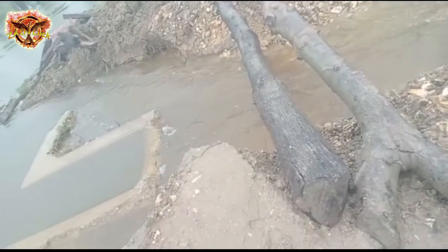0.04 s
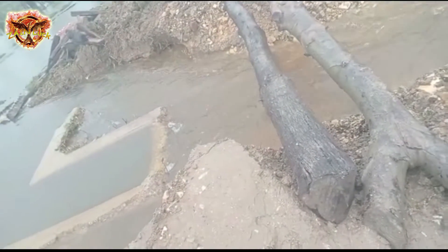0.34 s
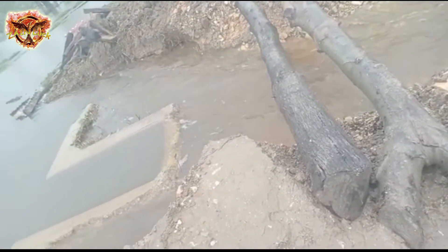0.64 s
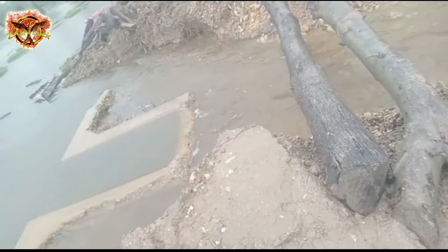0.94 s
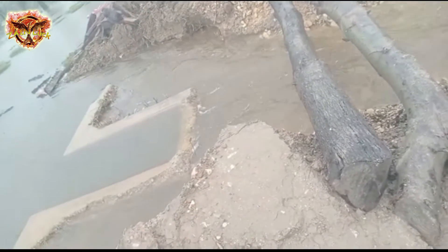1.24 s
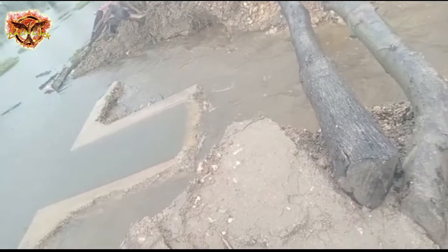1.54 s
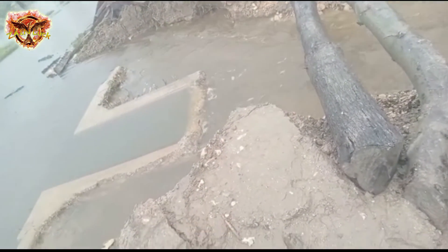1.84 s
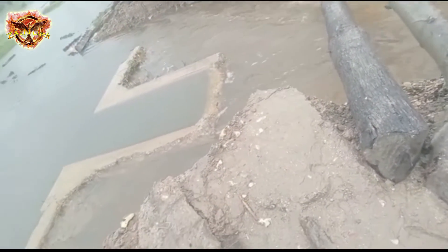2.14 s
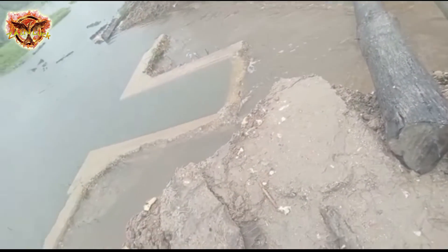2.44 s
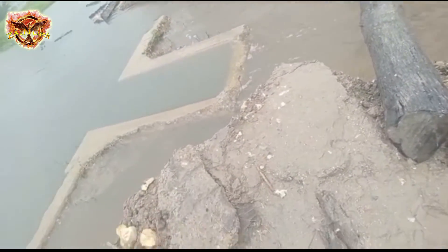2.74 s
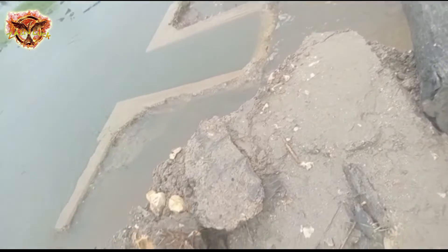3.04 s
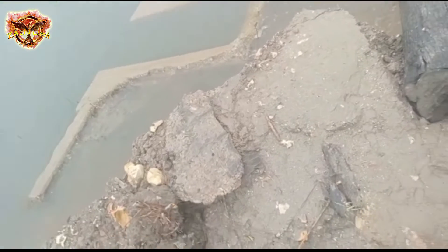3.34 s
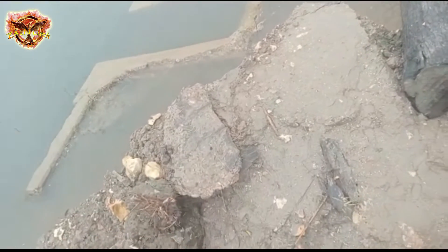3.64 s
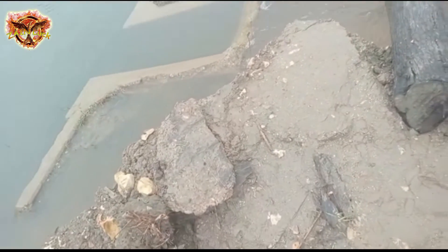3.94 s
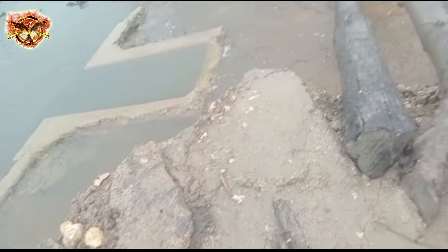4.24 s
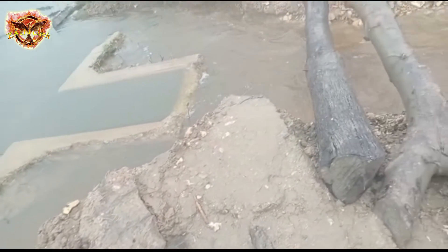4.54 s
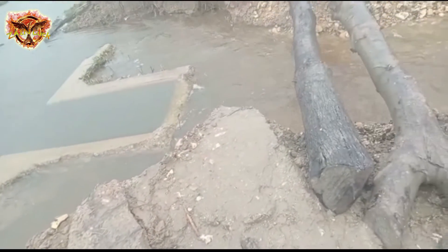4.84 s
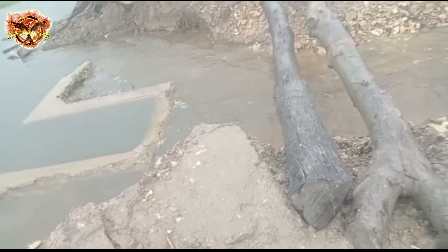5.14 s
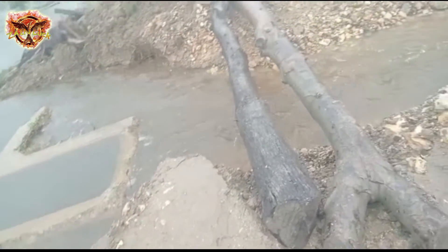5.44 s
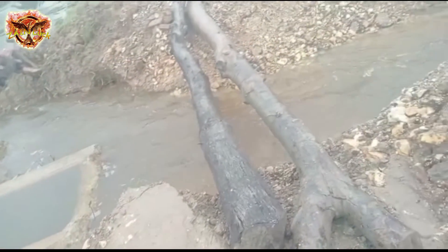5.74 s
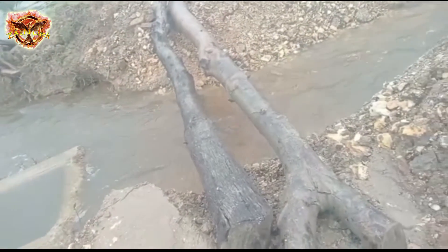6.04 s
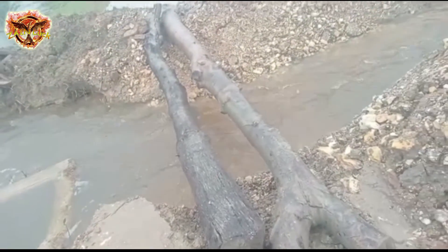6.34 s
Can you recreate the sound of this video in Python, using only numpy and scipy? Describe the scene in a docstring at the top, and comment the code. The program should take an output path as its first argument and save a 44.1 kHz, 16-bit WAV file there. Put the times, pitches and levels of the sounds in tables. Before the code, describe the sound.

A shallow muddy stream flows throughout with a steady fizzing rush, a lower gurgle and the odd glug. Over it, water drops strike the microphone in quick irregular ticks and hollow knocks, some much harder than others. Light wind rumbles underneath and swells into a soft gust past the middle. It is heard outdoors from the bank on a dull handheld microphone.

```python
"""Muddy floodwater rushes through a gap in a gravel road while drops knock sharply on the microphone.
Clumps of ringing bubbles make the stream: a dense fizz and rush over a lower gurgle, with the odd glug.
Each drop rings the microphone's housing with a thump, a knock and a tick. Wind rumbles on the port,
swelling to a soft gust past the middle. All is heard from the bank on a dull handheld microphone."""
import sys
import numpy as np
from scipy import signal
from scipy.fft import rfft, irfft, next_fast_len
from scipy.io import wavfile
from scipy.ndimage import uniform_filter1d, minimum_filter1d

SR = 44100
rng = np.random.default_rng(int(sys.argv[2]) if len(sys.argv) > 2 else 0)


def master(y):
    """Save y as 16-bit WAV."""
    cut = np.clip(np.atleast_2d(y).T, -1, 1)
    pcm = np.round(cut * 32767)  # scale
    wavfile.write(sys.argv[1], SR, pcm.astype(np.int16))


N = 286650
TIME = np.arange(N) / SR
THUMP_CYCLES, KNOCK_CYCLES, TICK_CYCLES = 4.17, 3.84, 7.27   # for the housing's rings to die by 60 dB


def from_db(db):
    """Decibels to gain."""
    return 10 ** (np.asarray(db) / 20)


def rms_one(x):
    """Scale to unit power."""
    return x / np.sqrt(np.mean(x ** 2) + 1e-20)


def in_time(rows):
    """Turn rows of a time in seconds and its values into one envelope per value."""
    times, *columns = np.transpose(rows)
    return [np.interp(TIME, times, column) for column in columns]


def add(out, sound, start_s):
    """Mix a short sound in at a given time."""
    at = int(np.clip(round(start_s * SR), 0, N))
    out[at:at + len(sound)] += sound[:N - at]


def coloured(x, spectrum):
    """Equalise along a curve of (Hz, dB) points."""
    size = next_fast_len(N + SR // 10)
    hz, db = np.transpose(spectrum)
    bin_hz = np.maximum(np.arange(size // 2 + 1) * SR / size, 1)
    gain = from_db(np.interp(np.log(bin_hz), np.log(hz), db))
    return irfft(rfft(x, size) * gain, size)[:N]


def softened(x, corner_hz):
    """Take off the treble, as a soft contact does by spreading a push in time."""
    return signal.sosfilt(signal.butter(2, np.clip(corner_hz, 100, .4 * SR), fs=SR, output="sos"), x)


def low_cut(x, corner_hz):
    """Roll off the bass."""
    return signal.sosfilt(signal.butter(2, corner_hz, "high", fs=SR, output="sos"), x)


def drift(rate_hz, hop=40, settle=2000):
    """A smooth random wander of unit power, mostly slower than rate_hz."""
    pole = np.exp(-2 * np.pi * rate_hz * hop / SR)
    noise = rng.standard_normal(N // hop + settle + 2)
    slow = signal.lfilter([1], [1, -2 * pole, pole * pole], noise)[settle:]
    return np.interp(np.arange(N) / hop, np.arange(len(slow)), rms_one(slow))


def ring(clicks, hz, cycles):
    """A unit click starts a ring at its crest, height near 1, which dies by 60 dB in so many cycles."""
    angle = 2 * np.pi * hz / SR
    decay = np.exp(-np.log(1000) * hz / (cycles * SR))
    strike = np.array([0, 1, -1]) * decay * np.sin(angle) / angle
    return signal.lfilter(strike, [1, -2 * decay * np.cos(angle), decay * decay], clicks + 1e-18)


def wind(level_db, lumps_db, upper_hz=83.4, deep_hz=100):
    """Eddies at the port make a lumpy rumble, whose weight moves up in pitch as the gust grows."""
    # The wind's rise and fall. Each row: time in seconds, relative level in dB.
    gusts = [(0.0, -52.5), (0.69, -49.5), (0.94, -56), (1.28, -51.5), (2.12, -46.5), (2.23, -49),
             (2.62, -42), (3.11, -47.5), (3.31, -45.5), (3.48, -37.5), (3.95, -41), (4.56, -29.5),
             (4.96, -41), (5.21, -37.5), (5.43, -45), (5.87, -46.5), (6.23, -59), (6.5, -47.5)]
    # The rumble's colour. Each row: frequency in Hz, gain in dB.
    rumble = [(20, -21), (40, -15.5), (70, -1), (120, 1), (180, -4.5), (260, -8.5), (380, -18),
              (600, -29.5), (4000, -94.5)]
    gust_db, = in_time(gusts)
    deep, upper = (coloured(noise, rumble) * from_db(lumps_db * drift(18))
                   for noise in rng.standard_normal((2, N)))
    upper = rms_one(low_cut(upper, upper_hz))
    deep = rms_one(softened(deep, deep_hz))
    deep_db = -50 + 0.54 * (gust_db - gust_db.mean())   # the deepest eddies swell less with a gust
    return from_db(gust_db + level_db) * upper + from_db(deep_db) * deep


def puffs(cycles, corner_hz, size=4096):
    """A lone eddy bumps the port with a dull thud."""
    # Single puffs of air. Each row: start in seconds, pitch in Hz, strength in dB.
    eddies = [(0.594, 288, -24.5), (2.663, 191, -17), (2.821, 172, -25.5), (3.268, 204, -21.5),
              (5.318, 144.4, -22.5)]
    out = np.zeros(N)
    push = softened(signal.unit_impulse(size), corner_hz)
    for start_s, hz, db in eddies:
        add(out, from_db(db) * ring(push, hz, cycles), start_s)
    return out


def glugs(life_s, rise):
    """A large bubble swells, rings and rises in pitch as it nears the surface."""
    # Air pockets closing in the stream. Each row: start in seconds, starting pitch in Hz, peak in dB.
    pockets = [(0.44, 586, -32.5), (0.525, 670, -56), (1.775, 632, -36), (1.8, 705, -57), (4.1, 610, -39.5),
               (5.045, 810, -45.5), (5.69, 820, -64)]
    out = np.zeros(N)
    age = TIME[:SR // 8] / life_s
    swell = age * np.exp(1 - age)
    for start_s, hz, db in pockets:
        phase = 2 * np.pi * hz * life_s * (age + rise * age ** 2)
        add(out, from_db(db) * swell * np.sin(phase), start_s)
    return out


def bubbles(low_hz, high_hz, per_s, cycles, spread_db, clump_db, pitches=24):
    """Bubbles of many sizes are born in clumps as wavelets break; each rings briefly at its pitch."""
    births = np.flatnonzero(rng.random(N) < per_s * from_db(clump_db * drift(7)) / SR)
    strengths = from_db(spread_db * np.minimum(rng.exponential(1, N), 4)) * rng.choice([-1, 1], N)
    pitch_index = rng.integers(0, pitches, N)
    out = np.zeros(N)
    for k, hz in enumerate(np.geomspace(low_hz, high_hz, pitches)):
        at = births[pitch_index[births] == k]
        clicks = np.zeros(N)
        clicks[at] = strengths[at]
        out += ring(clicks, hz, cycles) * hz / high_hz   # all sizes share the power evenly per Hz
    return rms_one(out)


def water(spectrum, near_bubbles, wash_db):
    """Single near bubbles stand out of the smooth wash of countless far ones."""
    wash = from_db(wash_db) * rng.standard_normal(N)
    return rms_one(coloured(near_bubbles + wash, spectrum))


def stream():
    """Large pockets of air gurgle, middle-sized bubbles rush, the smallest fizz."""
    # The surge of the flow. Each row: time in seconds, then gurgle, rush and fizz faders in dB.
    surge = [(0.0, -51, -41, -52), (0.98, -51, -45, -55), (1.14, -50.5, -40.5, -53),
             (1.3, -49.5, -45.5, -58.5), (1.9, -50.5, -45, -57.5), (2.06, -51, -44.5, -52.5),
             (2.24, -54, -49.5, -64.5), (2.51, -51.5, -48, -56.5), (2.66, -51.5, -46.5, -60),
             (3.98, -51, -42.5, -48), (4.27, -51, -42.5, -49.5), (4.47, -52, -44, -52.5),
             (4.96, -55.5, -47.5, -58), (5.12, -49.5, -45, -56.5), (5.43, -56, -46, -57),
             (5.77, -47, -42, -45.5), (6.23, -52.5, -40.5, -46.5), (6.5, -51.5, -44, -44.5)]
    # The colours of the three layers. Each row: frequency in Hz, gain in dB.
    gurgle_eq = [(150, -11.5), (330, -19), (470, -2.5), (620, -1), (800, -6.5), (1050, -11.5), (1500, -16),
                 (2500, -37), (8000, -74.5)]
    rush_eq = [(800, -21.5), (1200, -11), (1500, -6.5), (1800, 1.5), (2300, 1), (2700, -1), (3300, -9.5),
               (4500, -27.5), (12000, -47.5)]
    fizz_eq = [(1800, -30.5), (2600, -6.5), (3100, -9), (3600, -8), (4200, -16.5), (5200, -10.5),
               (7000, -22.5), (12000, -39.5)]
    gurgle_db, rush_db, fizz_db = in_time(surge)
    large = bubbles(330, 1384, per_s=170, cycles=37, spread_db=1.5, clump_db=2)
    gurgle = from_db(gurgle_db + 2) * water(gurgle_eq, large, wash_db=1)
    medium = bubbles(1350, 3130, per_s=1400, cycles=47, spread_db=4.5, clump_db=3)
    rush = from_db(rush_db) * water(rush_eq, medium, wash_db=1)
    small = bubbles(2500, 5400, per_s=1600, cycles=38, spread_db=4, clump_db=4.5)
    fizz = from_db(fizz_db + 2.5) * water(fizz_eq, small, wash_db=2)
    return gurgle + rush + fizz


def spray(per_s, level_db, spread_db):
    """Fine droplets patter faintly on the housing, each with its own mix of knock and tick."""
    landed = (rng.random(N) < per_s / SR) * from_db(level_db)
    knocks, ticks = landed * from_db(spread_db * rng.uniform(-2.2, 1, (2, N)))
    patter = ring(knocks, 1000, KNOCK_CYCLES) / 2 + ring(ticks, 2900, TICK_CYCLES)
    return softened(patter, corner_hz=7400)


def small_drops(count=32):
    """Weak drops land at any moment, anywhere on the housing; gives extra rows of hits for drops()."""
    # The range of the weak drops, lowest row then highest. Each row: strength in dB,
    # heaviness from 0 to 1, then thump, knock and tick pitches in Hz.
    limits = [(-26, .05, 170, 700, 1920), (-7.5, 0.56, 450, 930, 3540)]
    low, high = np.column_stack([[0, N / SR], limits])
    return low + (high - low) * rng.random((count, len(low)))


def drops(rebound_s, rebound_db, leak_hz, spit_db=-26, spit_scatter_db=8.5, size=2048):
    """Each drop is one push on the housing: heavy ones thump and knock hollowly, light ones tick."""
    # Drops on the housing. Each row: start in seconds, strength in dB, heaviness from 0 to 1,
    # then thump, knock and tick pitches in Hz.
    hits = [(0.0159, -1, 0.37, 370, 1120, 3000), (0.034, -18, 0.79, 360, 815, 2170),
            (0.0771, 3, 0.25, 400, 1150, 2400), (0.1319, -1.5, 0.62, 270, 677, 1820),
            (0.231, -3, 0.54, 400, 616, 2330), (0.235, -0.5, 0.63, 530, 1240, 3200),
            (0.3611, 1.5, 0.38, 380, 1770, 2210), (0.466, -11, 0.55, 260, 800, 2600),
            (0.5107, -3, 0.0, 300, 1740, 3500), (0.5133, 5.5, 0.35, 340, 930, 2980),
            (0.5878, -15.0, 0.54, 197, 660, 1530), (0.6897, -4.5, 0.53, 310, 1240, 2580),
            (0.8286, -7, 0.47, 480, 1530, 2190), (0.897, 14.5, 0.3, 530, 1090, 3320),
            (0.945, -3.5, 0.36, 390, 1180, 2470), (0.996, -21, 0.68, 310, 520, 2250),
            (1.0382, -1, 0.41, 370, 1040, 2140), (1.0672, -4, 0.0, 340, 1870, 3130),
            (1.0789, -8.5, 0.58, 470, 1870, 2370), (1.1451, -0.5, 0.43, 320, 1750, 2190),
            (1.2289, -1.5, 1.0, 350, 1140, 2430), (1.2628, -5.5, 0.48, 510, 840, 2430),
            (1.3137, 0, 0.64, 230, 750, 2740), (1.468, -2, 0.64, 330, 960, 2030),
            (1.4818, -8.5, 0.52, 340, 870, 2370), (1.5289, 3, 0.58, 400, 2020, 4000),
            (1.6404, -4.5, 0.5, 340, 870, 2160), (1.8407, -1, 0.58, 250, 890, 3160),
            (1.8734, -8.5, 0.57, 360, 810, 2420), (1.9576, -5, 0.54, 230, 910, 1410),
            (1.992, -1.5, 0.48, 530, 1000, 2170), (2.0161, -10, 0.71, 310, 710, 2940),
            (2.0296, -6.5, 0.74, 280, 770, 2040), (2.0343, -4, 0.61, 310, 1870, 2690),
            (2.0496, -4, 0.54, 470, 880, 2140), (2.178, -0.5, 0.22, 380, 805, 3530),
            (2.4696, -11.5, 0.85, 310, 1580, 3180), (2.4813, -8, 0.51, 290, 910, 1870),
            (2.546, -5.5, 0.51, 240, 1010, 2570), (2.5757, -6, 0.47, 420, 1100, 2400),
            (2.603, -9, 0.68, 190, 850, 2620), (2.6347, 0, 0.0, 250, 920, 3900),
            (2.7252, -3.5, 0.45, 330, 1660, 3480), (2.9337, -7.5, 0.53, 340, 900, 2270),
            (2.9706, -10.0, 0.68, 198, 1120, 2880), (3.0166, -13, 0.66, 240, 606, 1660),
            (3.0397, -5.5, 0.6, 430, 470, 2150), (3.3358, -4, 0.43, 270, 680, 2780),
            (3.46, -18.5, 0.68, 370, 432, 2500), (3.5543, 4, 0.82, 320, 1810, 2460),
            (3.5695, -3, 0.52, 530, 1070, 3800), (3.5742, -5, 0.57, 350, 830, 1820),
            (3.6538, -2, 0.2, 450, 900, 2430), (3.6687, 5, 0.26, 270, 875, 3000),
            (3.767, 3.5, 0.34, 270, 1030, 2340), (3.7698, 4, 0.5, 230, 760, 2800),
            (4.0024, -1, 0.54, 230, 830, 2730), (4.0548, -2, 0.38, 220, 1020, 2380),
            (4.1372, -2.5, 0.59, 340, 1280, 2370), (4.1669, -5.5, 0.51, 270, 1090, 3040),
            (4.3572, -11, 0.7, 294, 1900, 2220), (4.4232, -4.5, 0.83, 300, 530, 2220),
            (4.6765, -10, 0.61, 250, 784, 2650), (4.7393, -6.5, 0.78, 270, 760, 1780),
            (4.884, -11, 0.4, 200, 970, 2410), (4.9128, -2.5, 0.5, 220, 1050, 1620),
            (4.991, -8.5, 0.51, 220, 840, 1510), (5.0128, -3.5, 0.43, 230, 830, 3150),
            (5.108, -12.5, 0.8, 340, 980, 1810), (5.157, -1, 0.26, 250, 950, 2840),
            (5.1644, -2.5, 0.41, 250, 885, 2490), (5.186, -13.5, 0.35, 360, 1300, 1500),
            (5.2022, -3.5, 0.75, 200, 880, 2060), (5.2271, -8, 0.67, 270, 710, 1920),
            (5.2422, -7.5, 0.57, 220, 580, 1490), (5.4579, -5.5, 0.32, 300, 860, 3600),
            (5.5187, 4, 0.35, 310, 980, 2450), (5.57, -7, 0.51, 280, 786, 2500),
            (5.6026, -5.5, 0.6, 530, 820, 2500), (5.6236, -10.5, 0.63, 420, 770, 2530),
            (5.6522, 1.5, 0.76, 340, 1000, 1970), (5.6832, -2, 0.6, 350, 960, 2460),
            (5.7235, 2.5, 0.48, 240, 790, 3500), (5.7623, -2.5, 0.51, 210, 850, 2090),
            (5.8521, -5.5, 0.53, 250, 533, 2100), (5.8876, 0.5, 0.37, 240, 950, 3130),
            (5.8996, 1.5, 0.45, 330, 1220, 2730), (5.909, -4, 0.64, 370, 1050, 2270),
            (5.9441, 9.5, 0.0, 360, 900, 3570), (5.9511, 4, 0.35, 400, 1370, 3780),
            (5.9657, 4, 0.18, 270, 537, 2870), (5.9806, -6, 0.4, 240, 895, 2270),
            (6.0387, -2.5, 0.63, 270, 600, 4160), (6.0808, -7.5, 0.44, 340, 930, 2210),
            (6.116, 3.5, 0.0, 220, 1870, 3840), (6.156, 0.0, 0.56, 260, 610, 3300),
            (6.1942, -1, 0.38, 270, 790, 3040), (6.3507, -4.5, 0.41, 390, 1870, 2680),
            (6.4347, -2.5, 0.35, 260, 1900, 3350), (6.477, -12, 0.55, 280, 620, 3970)]
    # How weight shares a push between the rings. Each row: heaviness, then thump, knock and tick in dB.
    ring_mix = [(0, -43.5, -26, 1), (0.401, -19, -11, -1.5), (.8, 0.5, 4.5, -6), (1, 7.5, -5, -8)]
    weights, *shares_db = np.transpose(ring_mix)
    landings = np.vstack([hits, small_drops()])
    scatter = rng.uniform(-0.85, 1, (len(landings), 2))
    out, touch = np.zeros(N), signal.unit_impulse(size)
    for (start_s, db, heaviness, thump_hz, knock_hz, tick_hz), (bite, lag) in zip(landings, scatter):
        # a harder drop makes a shorter, brighter contact; a heavier one spreads out
        contact = softened(touch, corner_hz=4450 * 2 ** (db / 27 - 0.54 * heaviness ** 2))
        spit = from_db(spit_db + spit_scatter_db * bite) * touch   # the tiny, sharp first touch
        push = from_db(db) * (contact + spit)
        thump_db, knock_db, tick_db = (np.interp(heaviness, weights, share) for share in shares_db)
        thump = from_db(thump_db) * ring(push, thump_hz, THUMP_CYCLES)
        knock = from_db(knock_db) * ring(push, knock_hz, KNOCK_CYCLES)
        tick = from_db(tick_db) * ring(push, tick_hz, TICK_CYCLES)
        add(out, thump + knock + tick, start_s)
        rebound = from_db(rebound_db) * (knock / 2 + tick)   # the drop collapses and taps again
        add(out, rebound, start_s + rebound_s * 2 ** (lag / 2))
    return low_cut(out, leak_hz)   # air leaks from the housing, so the lowest part of each push is lost


def scene():
    """Stream, drops and wind at one microphone."""
    flood = stream() + glugs(life_s=0.0072, rise=0.0083)
    taps = drops(rebound_s=0.001223, rebound_db=-9.5, leak_hz=73.4)
    patter = spray(per_s=22, level_db=-32, spread_db=11.5)
    air = wind(level_db=1.0, lumps_db=2.16) + puffs(cycles=10.0, corner_hz=350)
    return (flood + taps + patter + air)[None]


def limited(x, ceiling, size=90):
    """A fast limiter turns the hardest knocks down to the ceiling."""
    gain = np.minimum(1, ceiling / (np.abs(x) + 1e-9))
    return x * uniform_filter1d(minimum_filter1d(gain, 2 * size), size)


def record(dry, hiss_db=-82.0, cutoff_hz=17000):
    """The microphone loses most treble above 5 kHz; peaks are held under full scale over a faint hiss."""
    # The microphone's response and the colour of its hiss. Each row: frequency in Hz, gain in dB.
    microphone_eq = [(15, -12), (60, 0.5), (3600, -1.5), (4100, -5), (4600, -9.5), (5100, -18), (5600, -27),
                     (7000, -22.5), (10000, -16.5), (12000, -24.5), (15000, -4.5), (16200, -33.5)]
    hiss_eq = [(3000, -8.5), (5500, 7), (7000, -3), (10000, -1), (12000, -2.5), (14800, -2.5),
               (15600, -1.5), (15900, -26)]
    heard = limited(coloured(dry[0], microphone_eq), ceiling=.9)
    hiss = from_db(hiss_db) * rms_one(coloured(rng.standard_normal(N), hiss_eq))
    top_cut = signal.cheby2(16, 50, cutoff_hz, fs=SR, output="sos")
    return signal.sosfilt(top_cut, heard + hiss)[None]


dry = scene()
out = record(dry)
master(out)
```